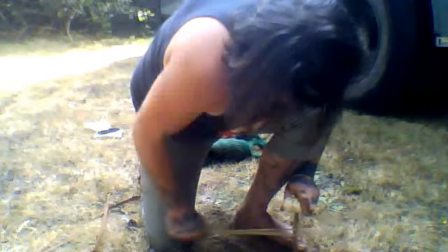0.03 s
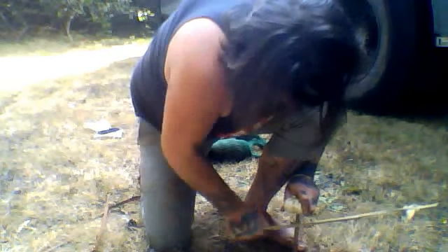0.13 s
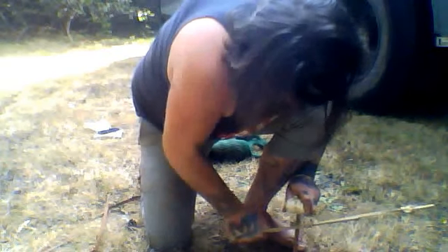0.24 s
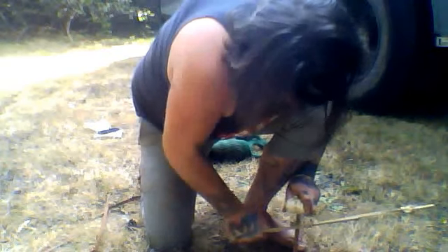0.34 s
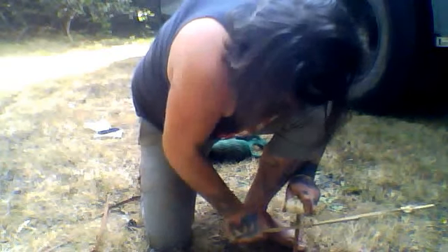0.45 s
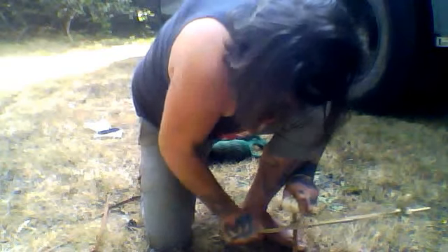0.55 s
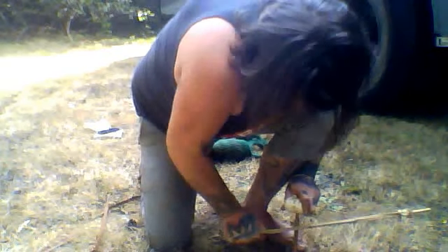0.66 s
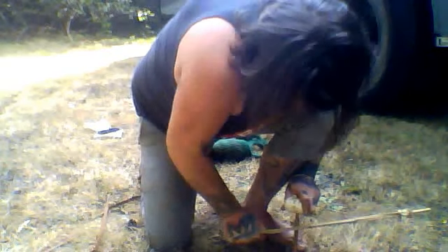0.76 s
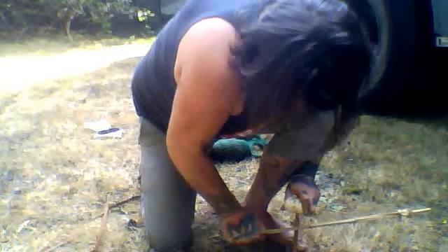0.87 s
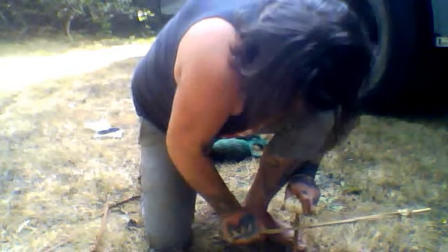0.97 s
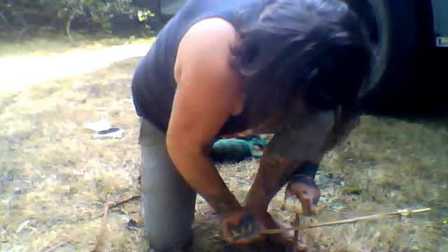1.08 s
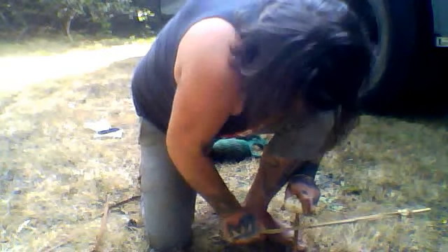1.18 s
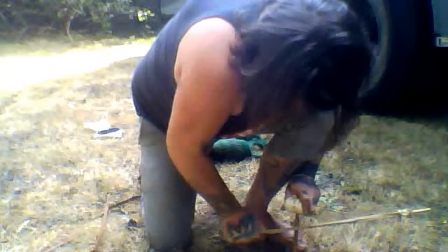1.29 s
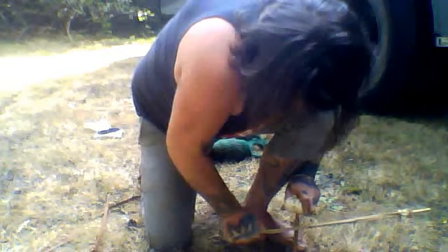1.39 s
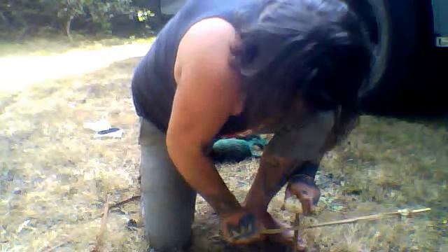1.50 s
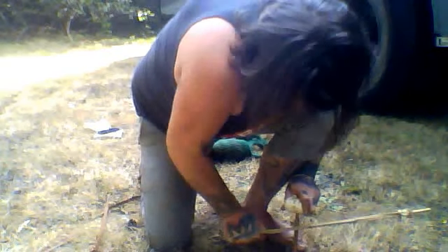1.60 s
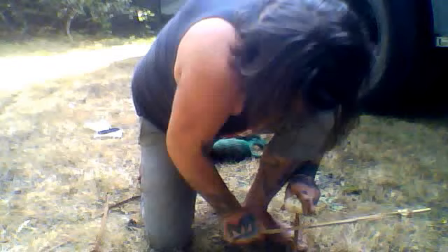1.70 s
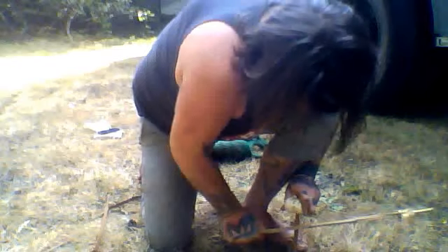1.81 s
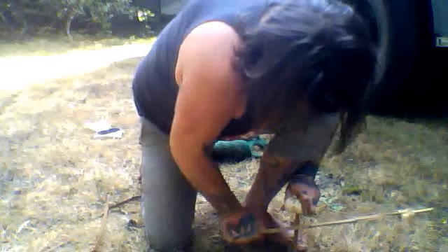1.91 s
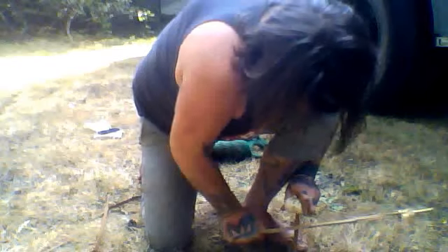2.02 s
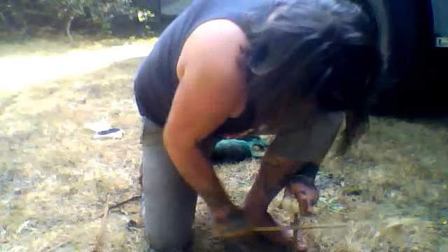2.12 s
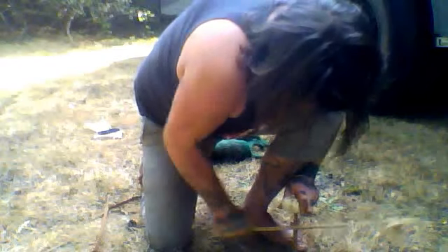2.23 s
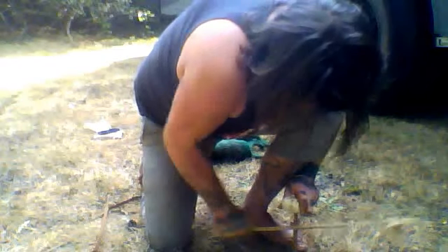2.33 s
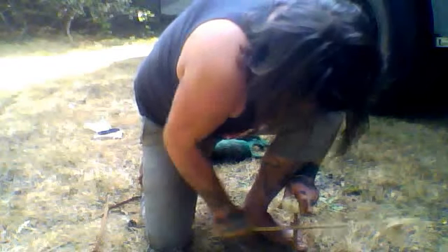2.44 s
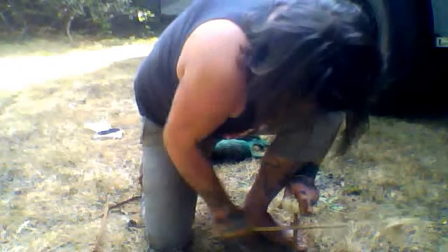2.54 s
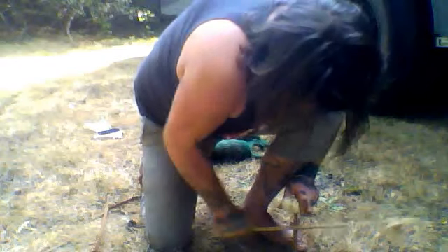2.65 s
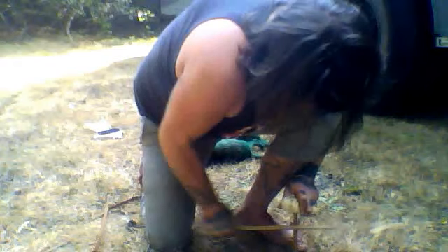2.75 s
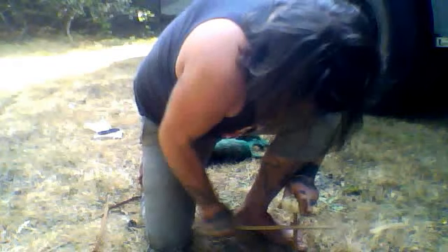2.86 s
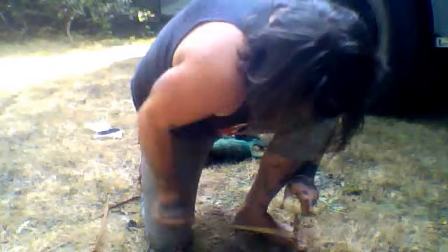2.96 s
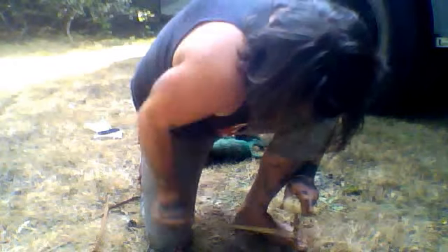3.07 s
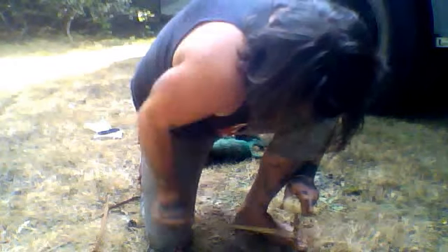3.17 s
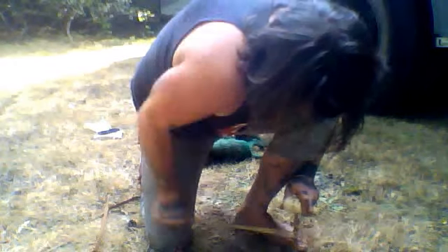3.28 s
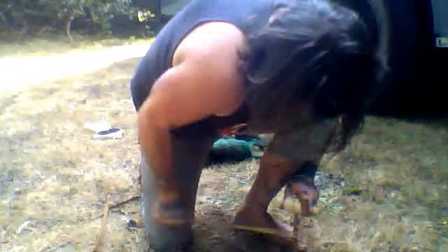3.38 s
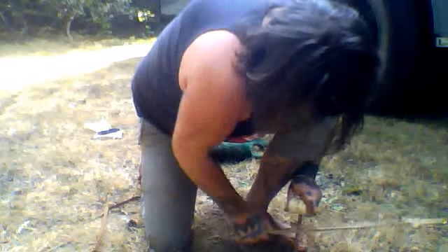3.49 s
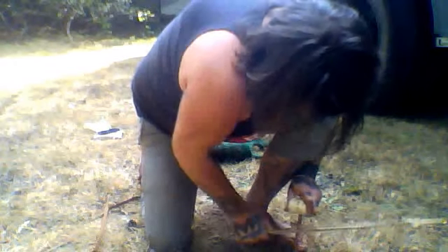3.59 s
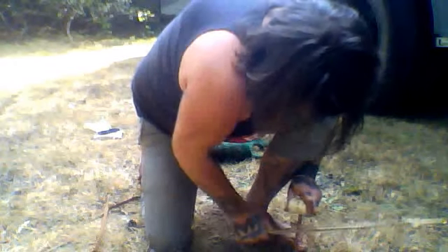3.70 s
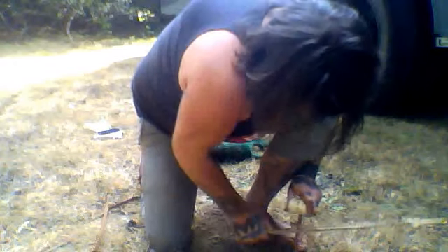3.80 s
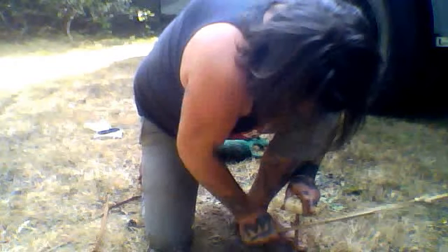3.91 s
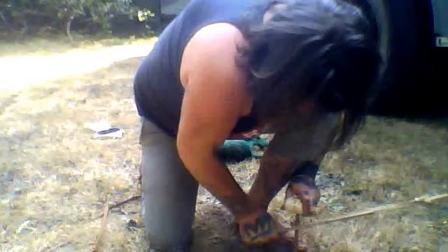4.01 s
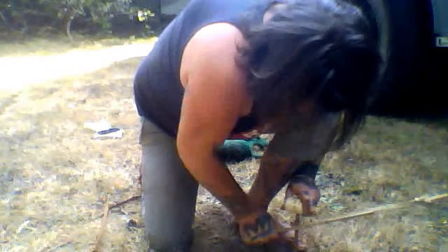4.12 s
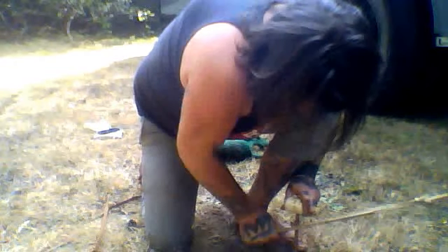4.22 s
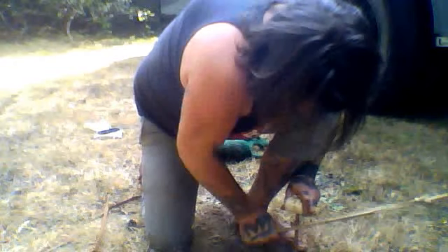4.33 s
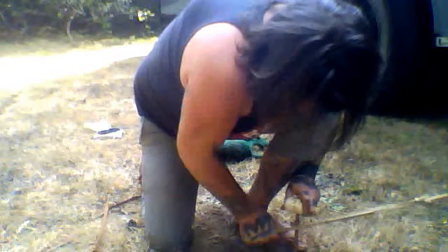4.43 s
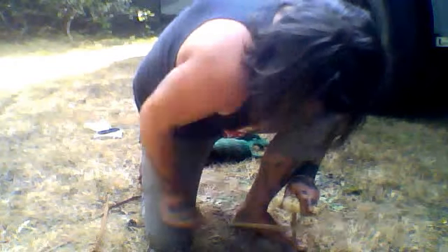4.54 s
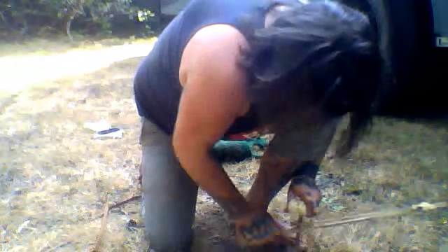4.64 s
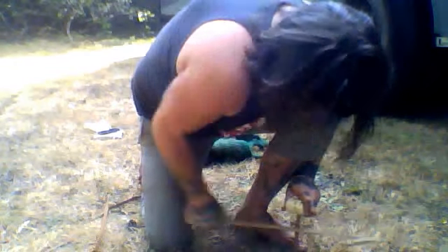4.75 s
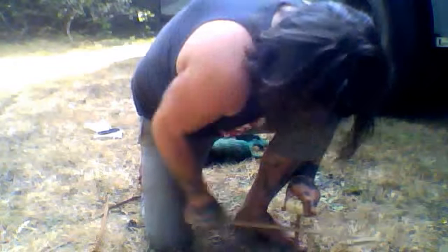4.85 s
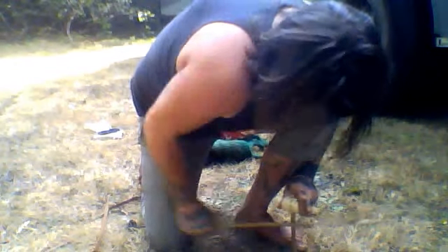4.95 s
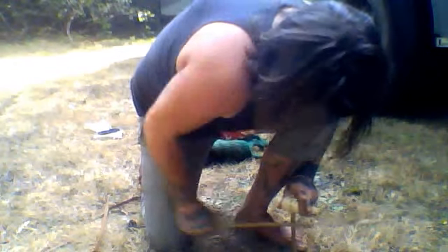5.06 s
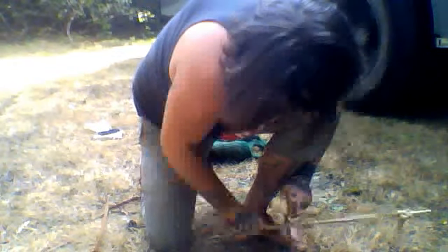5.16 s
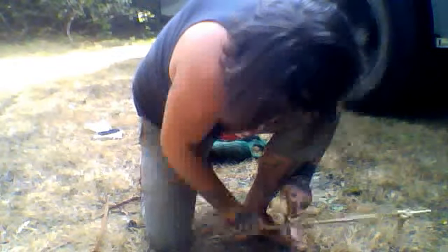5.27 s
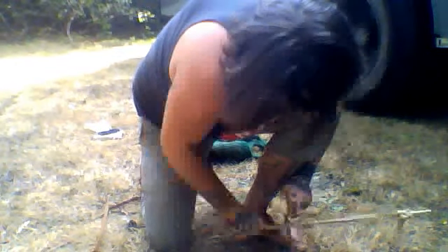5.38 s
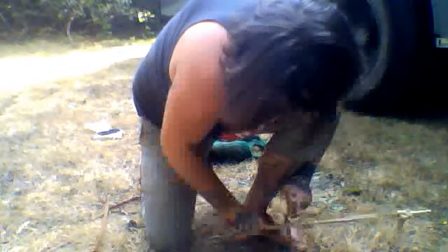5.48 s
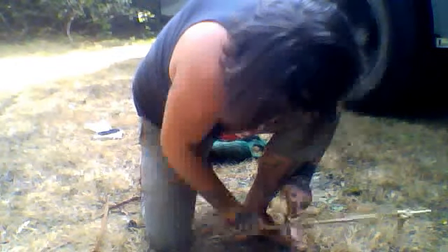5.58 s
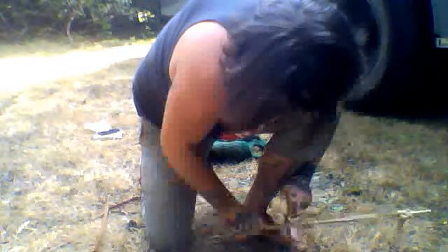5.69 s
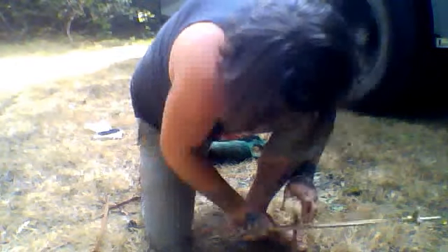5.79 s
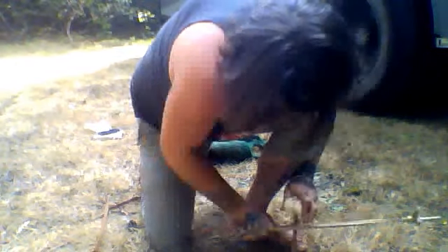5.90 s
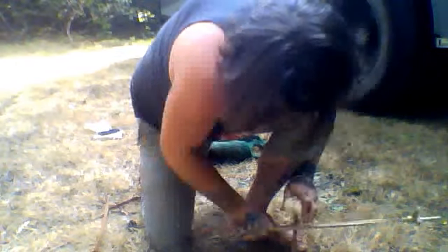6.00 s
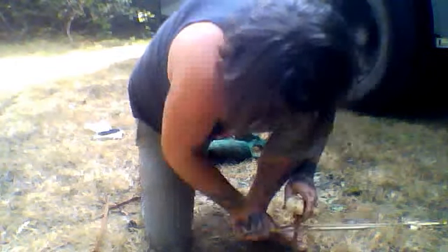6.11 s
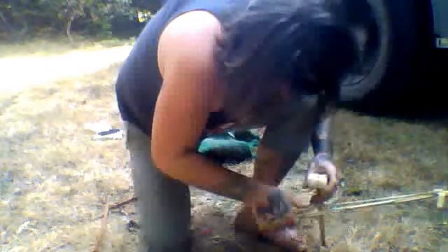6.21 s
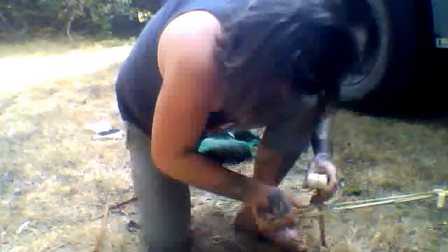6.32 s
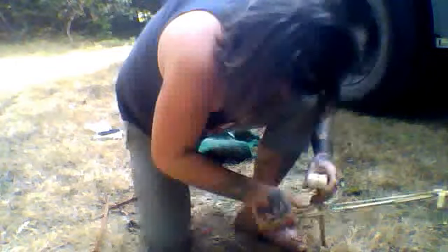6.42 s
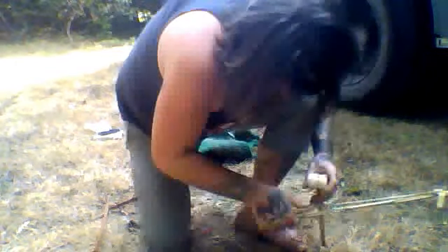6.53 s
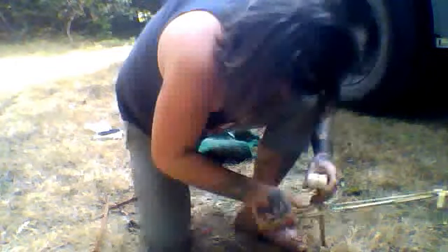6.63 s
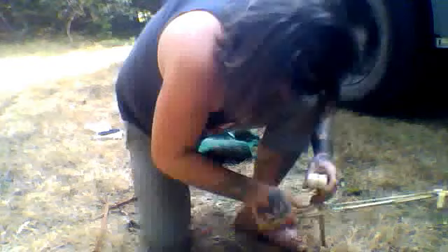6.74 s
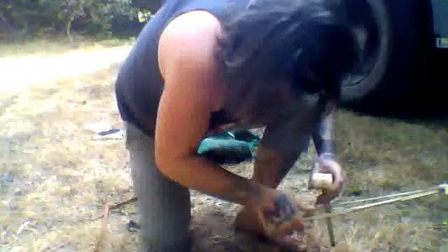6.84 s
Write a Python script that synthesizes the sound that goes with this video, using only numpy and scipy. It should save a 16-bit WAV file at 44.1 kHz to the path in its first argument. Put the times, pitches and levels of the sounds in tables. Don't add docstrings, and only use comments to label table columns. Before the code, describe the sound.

Close wooden friction: abrupt strokes alternate about six times a second, one way a sharp crack, the other a longer chattering, fibrous rasp. Squeaks sit in the mid-high range while the board knocks and hoots softly below. The first strokes are weak, the middle ones loudest. Gaps between are nearly empty, with faint low wind puffs. After the last stroke only a tiny tick and quiet remain. Dry open air, thin sound.

```python
import sys
import numpy as np
from scipy import signal
from scipy.fft import rfft, irfft
from scipy.io import wavfile
from scipy.ndimage import uniform_filter1d

SR = 44100
rng = np.random.default_rng(int(sys.argv[2]) if len(sys.argv) > 2 else 0)


def materialize(psi):
    bounded = np.clip(np.atleast_2d(psi).T, -1, 1)
    quanta = np.round(bounded * 32767).astype(np.int16)
    wavfile.write(sys.argv[1], SR, quanta)


def convert_level_to_amplitude(level_db):
    exponent = np.asarray(level_db, float) / 20
    return 10 ** exponent


N = 301898
STEP = 32


def evened(x):
    return x / np.sqrt(np.mean(x ** 2) + 1e-20)


def smoothed(x, size):
    return uniform_filter1d(uniform_filter1d(x, size=size), size=size)


def add(mix, s, sound):
    part = mix[round(s * SR) - len(sound) // 2:][:len(sound)]
    part += sound


def coloured(x, points):
    hz = np.fft.rfftfreq(len(x), 1 / SR) + 1
    point_hz, point_db = np.transpose(points)
    gain_db = np.interp(np.log(hz), np.log(point_hz), point_db)
    return irfft(rfft(x) * convert_level_to_amplitude(gain_db), len(x))


def patchy(x, depth_db, size):
    z = signal.stft(x, nperseg=size)[2]
    field = uniform_filter1d(rng.standard_normal(z.shape), size=3, axis=0)
    field = uniform_filter1d(field, size=5, axis=1)
    z = z * convert_level_to_amplitude(depth_db * evened(field))
    return evened(signal.istft(z, nperseg=size)[1][:N])


def spread(power):
    return np.sqrt(np.interp(np.arange(N), np.arange(power.shape[1]) * STEP, power.sum(0)))


def bursts(rows, rough, skew, detune):
    out = np.zeros(N)
    luck = rng.random((len(rows), 5))
    grit = rng.standard_normal(N)
    for (s, db, hz, ms), (a, b, *phase) in zip(rows, luck):
        u = np.arange(-3 * ms * SR // 1000, 3 * ms * SR // 1000) / SR
        reach_s = np.where(u < 0, 1 - skew, 1 + skew) * ms / 2000
        shape = convert_level_to_amplitude(-6 * (abs(u) / reach_s) ** 1.72)
        modes_hz = hz * np.array([1, 1 - detune * (0.51 + a), 1 + detune * (0.5 + b)])
        edge = rough * min(1, 4.5 / ms)
        tones = np.cos(2 * np.pi * (modes_hz[:, None] * u + np.c_[phase]))
        ring = np.array([1, edge, edge]) @ tones
        ring = shape * (ring + 0.6 * edge * grit[round(s * SR):][:len(u)])
        add(out, s, convert_level_to_amplitude(db) * ring / abs(ring).max())
    return out


def lasting(rows, ms):
    return [(*row, ms) for row in rows]


def per_turn(rows, turns, ms):
    return [(s + k * turn_ms / 1000, db - fade_db * abs(k), hz, ms)
            for s, db, hz, turn_ms, fade_db in rows for k in turns]


# (time [s], peak [dB], ring [Hz], turn [ms], fade per turn [dB])
CATCHES = [(.6534, -23, 2880, 9.5, 4), (.9454, -11, 2930, 21.6, 19), (1.2758, -9, 3020, 26, 5),
           (1.5891, -3, 2800, 24, 15), (1.8954, -6, 3020, 25.4, 14), (2.2026, -8, 3150, 24.1, 5),
           (2.513, -17, 2810, 24, 14), (2.799, -13, 3230, 15.8, 8), (3.0913, -5, 3220, 21.6, 9),
           (3.3836, -17, 3080, 25.6, 3), (3.958, -8, 2500, 24.7, 14), (4.2739, -16, 3060, 9.6, 1.2),
           (4.5267, -9, 2910, 32.3, 16), (4.8232, -11, 2900, 26.7, 4), (5.1089, -7, 2530, 27.9, 14),
           (5.4052, -6, 2940, 24, 24), (5.707, -14, 3050, 23, 18)]
# (loudest time [s], peak [dB], ring [Hz], turn [ms], fade per turn [dB])
CHATTER = [(.7475, -20, 2240, 20, 14), (1.0788, -16, 2700, 19.1, 3.5), (1.3974, -11, 2900, 18.2, 6),
           (1.7101, -14, 3000, 17.2, 4.5), (2.0141, -12, 3160, 20.2, 17), (2.3207, -15, 2800, 19.1, 1.2),
           (2.631, -23, 3210, 17, 5), (2.9137, -12, 2450, 14, 1.2), (3.2082, -10, 2540, 14.5, 6),
           (3.4831, -19, 2200, 16.8, 0), (3.7835, -13, 2750, 14, 2.2), (4.0612, -18, 2590, 13, 6),
           (4.3498, -22, 2630, 15, 3), (4.6453, -14, 2420, 15, 10), (4.927, -21, 3000, 14, 2.2),
           (5.231, -21, 2600, 14, 4), (5.525, -18, 2500, 16.6, 0), (5.8458, -19, 2300, 15, 5)]
# (time [s], peak [dB], ring [Hz])
STRAYS = [(1.3091, -19, 3110), (1.9498, -26, 3150), (2.8648, -25, 3110), (2.8788, -12, 2440),
          (2.8842, -17, 2800), (2.9428, -21, 2530), (3.1661, -15, 3340), (3.2333, -25, 2950),
          (3.4331, -29, 3070), (3.453, -23, 3060), (3.4933, -19, 2830), (3.5244, -17, 2170),
          (3.8039, -16, 2430), (3.9218, -20, 2840), (4.2517, -26, 2920), (4.5651, -25, 3170),
          (4.6751, -26, 3090), (4.8817, -22, 2160), (4.8966, -24, 2760), (5.1594, -28, 2670),
          (5.4723, -21, 2230), (5.5349, -22, 2440), (6.353, -42, 4250), (6.354, -56, 3400),
          (5.7075, -12, 3850), (1.4349, -24, 3120), (1.349, -24, 2400)]


def catches():
    rows = per_turn(CATCHES, range(2), 1.7)
    rows += per_turn(CHATTER, range(-1, 2), 1.9)
    rows += lasting(STRAYS, 1.8)
    return bursts(rows, rough=0.36, skew=0.15, detune=0.25)


# (time [s], peak [dB], ring [Hz], length [ms])
CHIRPS = [(.0735, -24, 2325, 3.7), (0.087, -34.5, 2187, 20), (.083, -44.5, 3250, 27),
          (.395, -24, 2214, 6.7), (.4154, -28, 2250, 6), (.7286, -28.5, 2290, 7), (.7495, -29.5, 3053, 8),
          (.119, -42, 3240, 4.5), (0.134, -36, 3160, 2.6), (0.296, -39, 2633, 8.5), (0.334, -31, 2910, 3.5),
          (.432, -31.5, 3990, 5.6), (0.456, -27, 4420, 2.2), (0.625, -37.5, 2880, 6.7)]
# (time [s], peak [dB], ring [Hz])
PEEPS = [(.0945, -33.5, 2237), (.574, -51, 2410), (.34, -46, 3620), (0.786, -43, 3130),
         (1.041, -34.5, 2360), (1.24, -49, 2630), (1.24, -45, 1950), (2.269, -42, 2860), (2.279, -37, 2130),
         (3.05, -49, 3270), (3.623, -50, 2590), (3.644, -49.5, 2760), (3.665, -44, 2610), (3.72, -54, 2000),
         (3.718, -58, 3270), (4.49, -34, 2700), (4.6, -36.5, 2850), (5.793, -36.5, 3150)]


def chirps():
    return bursts(CHIRPS + lasting(PEEPS, 7.7), rough=0.2, skew=0.1, detune=0.12)


# (time [s], peak [dB], ring [Hz])
FIBRE_TICKS = [(0.0857, -33, 3110), (0.7459, -22, 2110), (1.0778, -20.5, 3420), (1.082, -24, 1757),
               (1.088, -27.5, 2070), (1.0973, -23, 3570), (1.0988, -23, 1673), (1.3598, -25, 2336),
               (1.378, -26, 2290), (1.3793, -24.5, 1757), (1.3877, -30, 1780), (1.392, -23.5, 2160),
               (1.3967, -17.5, 3430), (1.3988, -24.5, 4410), (1.4069, -25, 3520), (1.4168, -24, 3500),
               (1.4167, -25.5, 1900), (1.5698, -21.5, 2620), (1.614, -25.5, 3220), (1.62, -24.5, 3200),
               (1.674, -25.5, 2260), (1.6922, -24, 2260), (1.7094, -22, 2275), (1.7095, -25.5, 4360),
               (1.7077, -22, 3477), (1.722, -25, 1773), (1.7223, -29, 2500), (1.7263, -24, 3503),
               (1.8785, -22, 2610), (1.9272, -25, 3190), (2.0155, -27.5, 4510), (2.0235, -24.5, 2660),
               (2.2261, -27, 1960), (2.302, -24.5, 2350), (2.309, -27, 2380), (2.3226, -21, 2170),
               (2.3316, -25.5, 2200), (2.339, -29, 4330), (2.34, -24, 3720), (2.6036, -37, 2120),
               (2.6395, -35.5, 1675), (2.9004, -19.5, 1680), (2.9011, -16.5, 3490), (2.924, -26, 3840),
               (2.931, -23.5, 3160), (3.0897, -20.5, 1980), (3.1109, -23, 2810), (3.181, -29.5, 2630),
               (3.1806, -28, 2120), (3.1908, -25.5, 2690), (3.2077, -17, 2046), (3.4515, -34.5, 3260),
               (3.4794, -22.5, 3250), (3.493, -21, 1855), (3.4919, -23.5, 3380),
               (3.5097, -25, 3380), (3.5122, -18.5, 1950), (3.5222, -30.5, 3260), (3.5251, -21.5, 1613),
              (3.742, -38.5, 3260), (3.7589, -27, 4200), (3.7686, -25, 3220), (3.7706, -20.5, 4340),
              (3.7839, -28.5, 3750), (3.7978, -34.5, 2150), (3.9578, -6, 3365), (4.0302, -31, 3180),
              (4.0508, -29, 3240), (4.058, -29.5, 4290), (4.0727, -27, 1980), (4.074, -24, 4240),
              (4.0838, -23.5, 3750), (4.0889, -29, 3700), (4.202, -28, 2630), (4.2076, -26.5, 2330),
              (4.304, -28.5, 2720), (4.3376, -34.5, 2020), (4.3517, -29.5, 1950), (4.3572, -29, 3150),
              (4.367, -33, 2220), (4.366, -32.5, 2710), (4.3724, -29.5, 2780), (4.6454, -23, 1930),
              (4.8718, -26, 2960), (4.9365, -28, 3260), (4.9417, -30, 1720), (4.9495, -30.5, 1515),
              (5.1089, -12.5, 2030), (5.109, -18, 3700), (5.1374, -31.5, 1950), (5.136, -27.5, 3330),
              (5.1984, -30, 2530), (5.2232, -37, 2720), (5.243, -27, 3530), (5.4063, -20.5, 2045),
              (5.478, -26.5, 2800), (5.4882, -27, 2230), (5.494, -25, 1880), (5.509, -21.5, 2100),
              (5.517, -26.5, 2730), (5.531, -30, 2920), (5.541, -23, 3080), (5.706, -15.5, 2200),
              (5.8253, -33, 2100), (5.8242, -29, 2950), (5.8388, -26.5, 3200), (5.8564, -25, 2020),
              (5.8587, -30, 3080), (5.8581, -30, 3530), (5.8692, -31.5, 1750)]


def fibre_ticks():
    return bursts(lasting(FIBRE_TICKS, 3.2), rough=0.2, skew=0.15, detune=0.1)


# (frequency [Hz], width [Hz], lift [dB])
BOARD_MODES = [(1700, 110, 3), (1960, 110, 5), (2270, 110, 5), (2700, 110, 5), (3230, 130, 6),
               (3750, 120, 3), (4230, 140, 5)]


def board(x, share):
    hz = np.fft.rfftfreq(N, 1 / SR)
    lift_db = sum(db * np.exp(-((hz - mode_hz) / width_hz) ** 2) for mode_hz, width_hz, db in BOARD_MODES)
    return irfft(rfft(x) * convert_level_to_amplitude(share * (lift_db - 6.0)), N)


# (frequency [Hz], gain [dB])
SNAP_BAND = [(1100, -49), (1350, -21.5), (1800, -3.5), (3600, 1.5), (4300, -8.5), (4900, -28.5),
             (6600, -45.5), (7300, -73.5)]


def snaps(rings, ticks):
    out = convert_level_to_amplitude(2.5) * board(coloured(rings, SNAP_BAND), share=0.36)
    return out + coloured(ticks, [(900, -50), (1300, 0), (4600, 0), (4900, -28), (7300, -60)])


def echoes(x, t60):
    t = np.arange(SR // 6) / SR
    taps = rng.standard_normal(len(t)) * convert_level_to_amplitude(-60 * t / t60) * (t > 0.0015)
    return signal.oaconvolve(x, taps / np.linalg.norm(taps))[:N]


def lead_ins(x):
    return echoes(x[::-1], t60=0.018)[::-1]


# (start [s], length [s], grind [dB], squeak [Hz], groan [dB])
PUSHES = [(.296, .052, -55.5, 2680, -100), (.631, 0.028, -55, 2796, -79), (.948, .003, -42, 2660, -56.5),
          (1.274, 0.021, -35.5, 3158, -61.5), (1.576, 0.031, -33, 2667, -55.5),
          (1.889, 0.018, -36, 2580, -53.5), (2.201, 0.037, -33.5, 3392, -54.5),
          (2.513, 0.014, -47.5, 3190, -77.5), (2.8, 0.0038, -39, 3109, -61),
          (3.089, .026, -35.5, 3538, -53), (3.379, 0.05, -42, 3270, -77), (3.613, 0.02, -55, 4250, -72),
          (3.927, .039, -30.5, 2802, -56.5), (4.261, 0.036, -51.5, 2916, -100),
          (4.526, 0.0053, -29.5, 3644, -56), (4.82, 0.024, -38, 3097, -60), (5.11, 0.015, -45, 3716, -61.5),
          (5.406, .004, -32, 3052, -46.5), (5.71, .002, -30.5, 3780, -66), (6.356, 0.02, -70.5, 4163, -100)]
# (start [s], length [s], grind [dB], squeak [Hz], groan [dB])
PULLS = [(.069, 0.045, -46.5, 2297, -66.5), (.405, 0.06, -49.5, 4190, -67.5), (.737, 0.039, -37, 2192, -61),
         (1.062, 0.048, -31, 1795, -47), (1.387, 0.023, -27.5, 1697, -48), (1.676, 0.062, -34, 4424, -54.5),
         (2.004, 0.031, -30.5, 2678, -58.5), (2.305, 0.048, -30, 3671, -50),
         (2.601, 0.043, -34, 1793, -66.5), (2.881, 0.069, -31, 2019, -48), (3.168, 0.058, -31, 2692, -52),
         (3.46, 0.068, -35.5, 1856, -52.5), (3.745, 0.063, -30, 1740, -62),
         (4.037, 0.056, -33.5, 2662, -49.5), (4.323, 0.059, -35, 2842, -56),
         (4.622, 0.0419, -35.5, 2676, -72.5), (4.907, 0.042, -33.5, 3343, -51),
         (5.211, 0.038, -33, 1911, -49), (5.475, 0.084, -40, 2113, -56.5), (5.802, 0.066, -38, 2215, -60)]
# (start [s], length [s], grind [dB], squeak [Hz], groan [dB])
EARLIER = (0, .002, -59, 3000, -85)
# (start [s], grind [dB], squeak [Hz], groan [dB])
BRUSHES = [(0.247, -73.5, 3840, -69), (0.573, -62, 2381, -65), (1.242, -57, 2516, -62.5),
           (1.349, -43.5, 1796, -91.5), (1.425, -46.5, 2663, -55), (1.94, -45, 3243, -104),
           (2.277, -45, 2214, -74.5), (2.733, -60.5, 2790, -70), (3.042, -53, 3305, -70),
           (3.335, -50, 2424, -64.5), (3.657, -62, 2740, -84), (3.715, -61, 3212, -90),
           (4.2, -44.5, 2420, -75), (4.485, -53.5, 2889, -58), (4.787, -55, 3578, -60.5),
           (4.872, -38, 1882, -67), (5.065, -58, 3272, -65), (5.146, -49.5, 2511, -77),
           (5.645, -67.5, 3390, -69.5)]


def strokes():
    brush_s, squeak_db, squeak_per_db = 0.022, 6.5, 0.46
    brushes = [(s, brush_s, *rest) for s, *rest in BRUSHES]
    columns = []
    for s, length_s, db, hz, low_db in [*PUSHES, *PULLS, EARLIER, *brushes]:
        lift_db = min(squeak_db - squeak_per_db * (db + 40), 13.0)
        columns.append((s, s + length_s, db, hz, lift_db, low_db))
    return np.transpose(columns)


def spells(level_db, rise_db_s, fall_db_s, tail_db, tail_db_s):
    t = np.arange(0, N + STEP, STEP) / SR
    start, end = strokes()[:2, :, None]
    before, after = np.maximum(start - t, 0), np.maximum(t - end, 0)
    tail = convert_level_to_amplitude(tail_db - tail_db_s * after) ** 2 * (after > 0)
    dying = convert_level_to_amplitude(-fall_db_s * after) ** 2 + tail
    return convert_level_to_amplitude(level_db[:, None] - rise_db_s * before) ** 2 * dying


def lurch():
    wobble = smoothed(rng.standard_normal(N), 200)
    return evened(convert_level_to_amplitude(1.3 * evened(wobble)))


def surge(rings):
    share = 0.4
    near = smoothed(abs(rings), 180) + convert_level_to_amplitude(-60)
    gain = 1 - share + share * near / uniform_filter1d(near, size=1500)
    return gain / np.sqrt(uniform_filter1d(gain ** 2, size=1500))


# (frequency [Hz], density [dB per Hz])
GRIND = [(900, -70.5), (1150, -30.5), (1300, -26), (1650, -5.5), (2000, -4), (3250, -5.5), (3900, -7),
         (4650, -9.5), (4750, -20.5), (5350, -24), (5700, -33), (6600, -32), (7000, -44), (7400, -69)]


def grind():
    level_db, squeak_hz, squeak_db = strokes()[2:5]
    ticks_per_s, rasp_db, last_s = 1300, -83, 5.95
    power = spells(level_db - 0.46, 1300, 1800, tail_db=-22, tail_db_s=300)
    power[0, :round(last_s * SR / STEP)] += convert_level_to_amplitude(rasp_db) ** 2

    ticks = convert_level_to_amplitude(4.2 * np.minimum(rng.exponential(1, N), 1.6))
    ticks = ticks * (rng.random(N) < ticks_per_s / SR) * rng.choice([-1, 1], N)
    gain = spread(power)
    bite = np.clip(gain / convert_level_to_amplitude(-46), 0.25, 1)
    rub = bite * evened(ticks) + np.sqrt(1.3 - bite ** 2) * rng.standard_normal(N)
    rub = patchy(board(coloured(rub, GRIND), share=1), depth_db=3.2, size=384)

    hz, t, z = signal.stft(rub, SR, nperseg=512, noverlap=384)
    away_hz = hz[:, None] - squeak_hz
    narrow, broad = np.exp(-(away_hz / 190) ** 2), np.exp(-(away_hz / 900) ** 2)
    shape = convert_level_to_amplitude(squeak_db * (1.1 * narrow + 0.5 * broad)) ** 2
    shape /= (abs(z) ** 2).mean(1) @ shape
    index = np.minimum(np.round(t * SR / STEP).astype(int), power.shape[1] - 1)
    now = power[:, index]
    blend = np.sqrt(shape @ (now / now.sum(0)))
    squeaky = signal.istft(z * blend, nperseg=512, noverlap=384)[1][:N]
    return gain * lurch() * evened(squeaky)


# (time [s], peak [dB], ring [Hz], length [ms])
KNOCKS = [(.1061, -39.5, 559, 24.6), (1.062, -34.5, 477, 8), (1.0815, -29.5, 497, 14),
          (1.1007, -30.5, 467, 9.2), (1.3963, -36, 548, 8.9), (1.4169, -28, 570, 6.9),
          (1.6952, -36, 498, 5.8), (1.7101, -29.5, 531, 8.5), (1.7278, -29, 477, 6.6),
          (2.0106, -40, 454, 20), (2.033, -43, 510, 18.3), (2.328, -38, 453, 8.1), (2.9067, -38, 520, 24),
          (2.9311, -30.5, 534, 15), (2.9554, -38, 600, 12), (3.2119, -27.5, 511, 7.3),
          (3.2359, -32.5, 590, 8.7), (3.4983, -31.5, 509, 21), (3.7848, -32, 1010, 6),
          (4.0666, -26.5, 533, 17), (4.0886, -29.5, 515, 16), (4.3556, -34.5, 684, 10),
          (4.38, -40, 640, 17), (4.9202, -43, 560.5, 36), (4.9598, -37.5, 594, 17),
          (5.2295, -39.5, 688, 16), (5.5311, -33.5, 614, 14.7), (5.553, -29, 603, 9.8),
          (5.8459, -37.5, 557, 12), (5.8718, -43, 568, 18.2)]
# (time [s], peak [dB], ring [Hz], length [ms])
MOANS = [
    (.461, -51, 574, 19),
    (2.27, -52.5, 217.3, 24),
    (3.337, -52.5, 209, 21),
    (3.8067, -47, 725, 27.5),
    (4.4913, -44, 973, 9.5),
    (5.131, -48, 275, 14),
]
# (time [s], peak [dB], ring [Hz])
HOOTS = [(0.268, -41, 456), (0.602, -54.5, 410), (0.92, -42.5, 460), (0.946, -36, 458), (1.2612, -43, 434),
         (1.562, -41.5, 468), (1.896, -55, 438), (2.172, -35.5, 463), (2.2014, -38.5, 443),
         (3.1043, -47.5, 462), (4.8262, -37, 434), (5.0774, -42, 492), (5.4139, -40.5, 443)]
# (time [s], peak [dB], ring [Hz])
MURMURS = [(0.083, -43.5, 589), (.295, -48, 466), (1.5918, -47, 418), (1.6161, -49.5, 470),
           (2.3635, -48.5, 537), (2.6492, -57, 480), (3.0935, -49, 674), (3.6077, -65.5, 756),
           (3.8064, -49.5, 452), (3.928, -50, 436), (4.535, -59.5, 984), (4.8244, -56, 216.2),
           (5.0632, -59, 243), (5.2287, -55, 276), (5.699, -65, 221)]


def knocks():
    rows = [*KNOCKS, *MOANS, *lasting(HOOTS, 17), *lasting(MURMURS, 21)]
    low = bursts(rows, rough=0.27, skew=0.099, detune=0.18)
    return coloured(low, [(110, -40.0), (200, -3.5), (1050, 1.5), (1500, -55.0)])


# (frequency [Hz], gain [dB])
GROAN = [(90, -39.5), (200, -24), (380, -15.5), (510, -3.5), (700, -11), (850, -20.5), (1000, -26.5),
         (1300, -24.5), (1800, -58.5)]


def groan():
    power = spells(strokes()[5] - 1.5, 1100, 820, tail_db=-14.5, tail_db_s=220)
    hum = patchy(coloured(rng.standard_normal(N), GROAN), depth_db=4.5, size=1024)
    return spread(power) * hum


# (time [s], peak [dB])
RUMBLE = [(1.006, -64), (1.202, -60), (1.363, -53), (1.727, -53.5), (1.961, -60.5), (2.035, -66.5),
          (2.653, -67), (4.836, -51), (4.908, -63), (5.143, -57), (5.431, -61), (5.93, -60), (6.05, -55),
          (6.144, -53.5), (6.184, -52.5), (6.343, -64.5)]
# (frequency [Hz], density [dB per Hz])
HISS = [(60, 3), (5200, -6.5), (5600, -17), (20000, -17)]


def air():
    s, db = np.transpose(RUMBLE)[:, :, None]
    t = np.arange(0, N, STEP) / SR
    gusts = convert_level_to_amplitude(db - 520 * abs(t - s)) ** 2 + convert_level_to_amplitude(-112) ** 2
    puff_band = [(8, -13.0), (20, 5.0), (45, -13.0), (90, -22.5), (200, -61.5)]
    puffs = evened(coloured(rng.standard_normal(N), puff_band))
    hiss = patchy(coloured(rng.standard_normal(N), HISS), depth_db=4, size=1024)
    return spread(gusts) * puffs + convert_level_to_amplitude(-91) * hiss


# (frequency [Hz], level [dB])
BLUR = [(150, -43), (1100, -42.5), (1450, -18.5), (4720, -14), (4850, -35.5), (6100, -43), (6500, -31),
        (7300, -70)]


def blur(x):
    frame, first, level_db = 1024, 255, -1
    window = signal.windows.kaiser_bessel_derived(2 * frame, 4 * np.pi)
    at = first + np.arange(N // frame - 2)[:, None] * frame + np.arange(2 * frame)
    power = abs(rfft(x[at] * window)) ** 2
    near = abs(uniform_filter1d(power, size=40, axis=1))
    near += 0.44 * power[:, frame // 16:frame // 4].mean(1, keepdims=True)
    uneven = uniform_filter1d(rng.standard_normal(near.shape), size=14, axis=1)
    near *= convert_level_to_amplitude(7 * evened(uneven))
    phase = np.exp(2j * np.pi * rng.random(power.shape))
    noise = convert_level_to_amplitude(level_db) * irfft(np.sqrt(near) * phase) * window
    return coloured(np.bincount(at.ravel(), noise.ravel(), N), BLUR)


def scene():
    rings = catches() + chirps()
    ticks = fibre_ticks()
    snap = snaps(rings, ticks)
    mix = snap + convert_level_to_amplitude(-12) * echoes(snap, t60=0.074) + convert_level_to_amplitude(-16) * lead_ins(snap)
    mix += grind() * surge(rings + ticks)
    mix += knocks() + groan() + air()
    return mix[None]


def roll_off(x):
    return signal.sosfilt(signal.butter(12, 15600, fs=SR, output="sos"), x)


def record(dry):
    gap_hz, edge_hz = (5370, 5650), 7500
    taps = signal.firwin(1023, [*gap_hz, edge_hz], pass_zero=True, window=("kaiser", 9), fs=SR)
    narrow = signal.oaconvolve(dry + blur(dry[0]), taps[None], "same")
    hiss_db = -99.5 - 3 * (np.arange(N) > 6.1 * SR)
    hiss = coloured(rng.standard_normal(N), [(5000, -20), (7300, -12), (7800, 0), (15000, 0)])
    return roll_off(narrow + convert_level_to_amplitude(hiss_db) * evened(hiss))


dry = scene()
out = record(dry)
materialize(out)
```